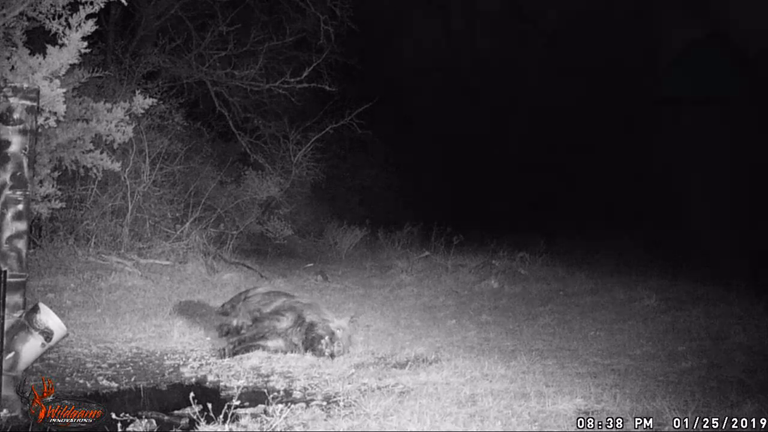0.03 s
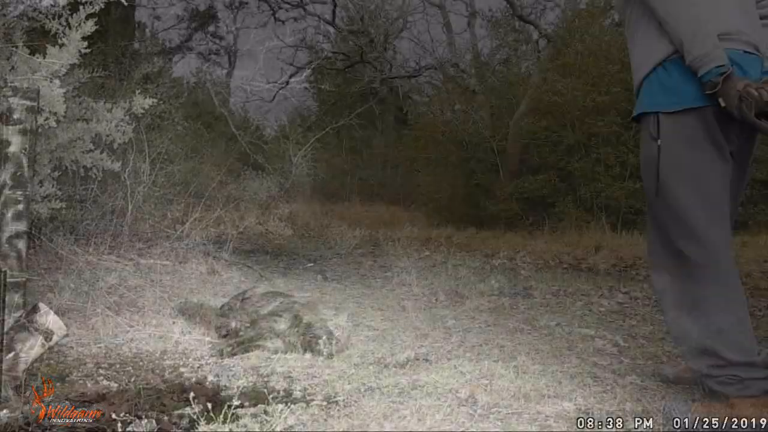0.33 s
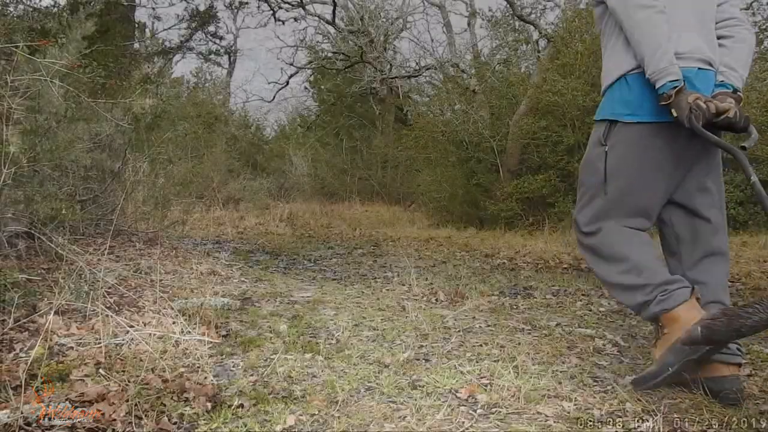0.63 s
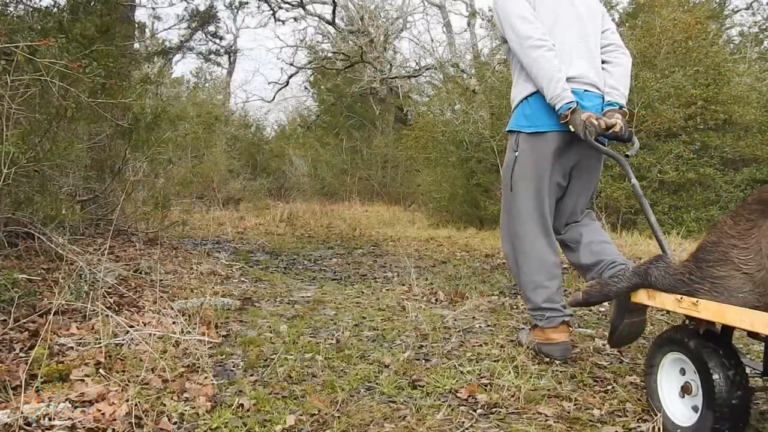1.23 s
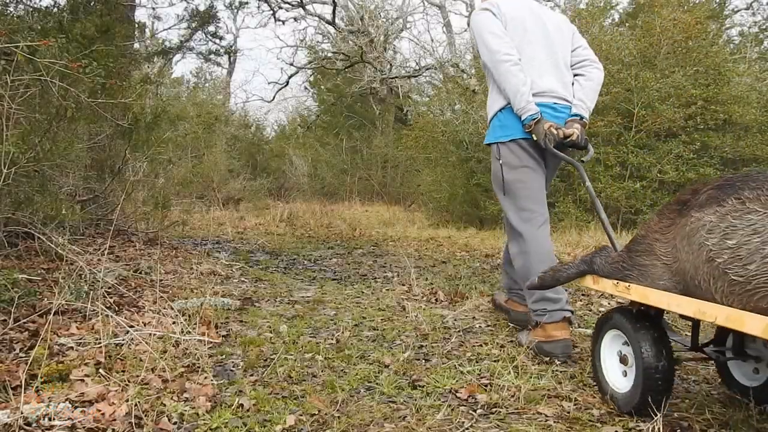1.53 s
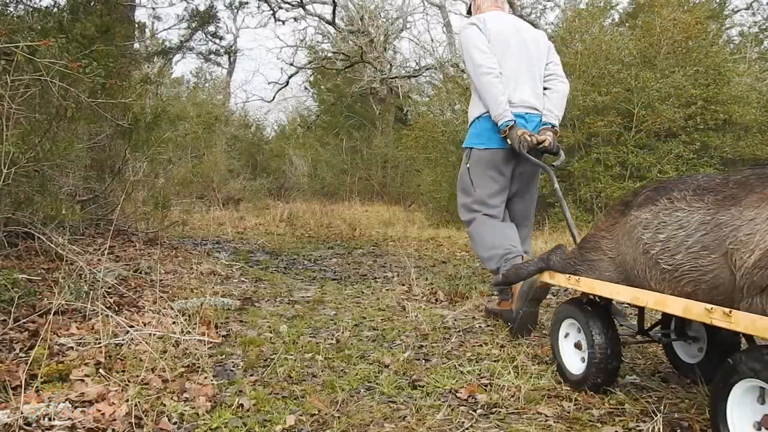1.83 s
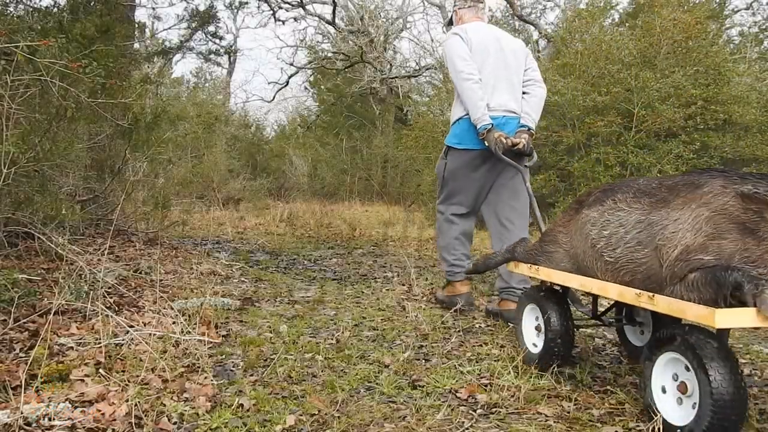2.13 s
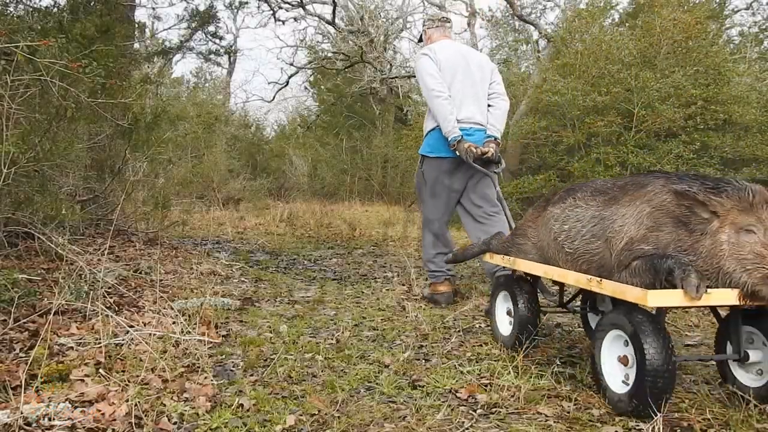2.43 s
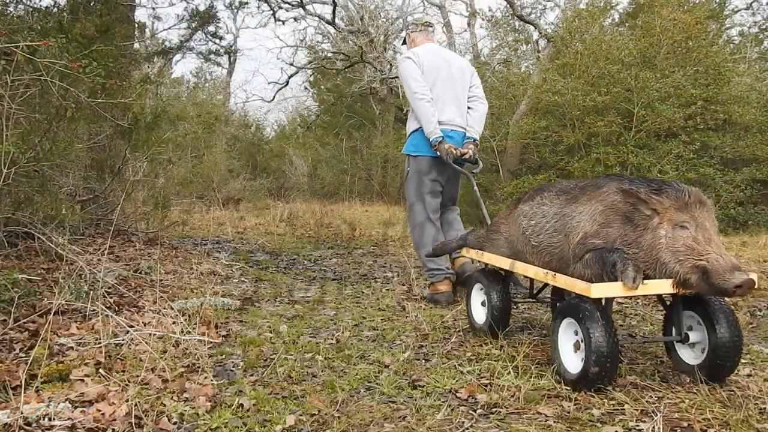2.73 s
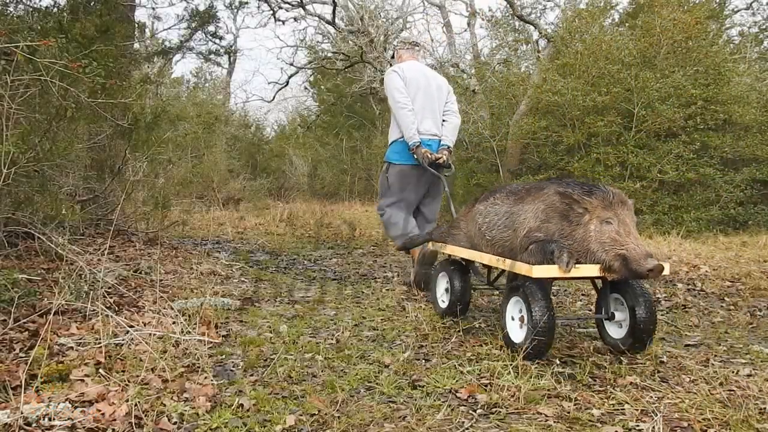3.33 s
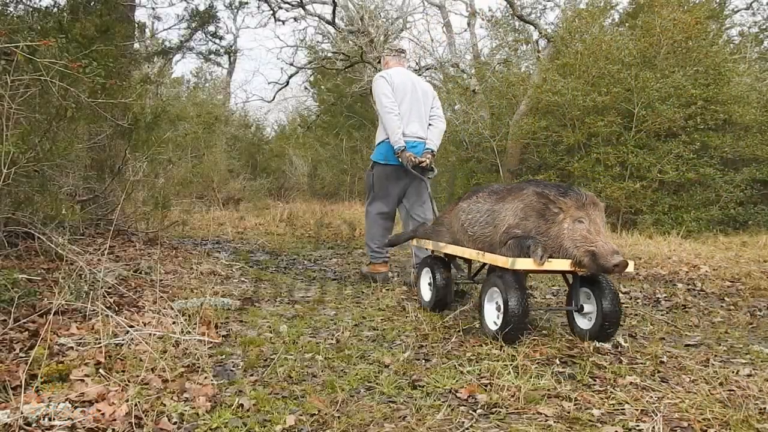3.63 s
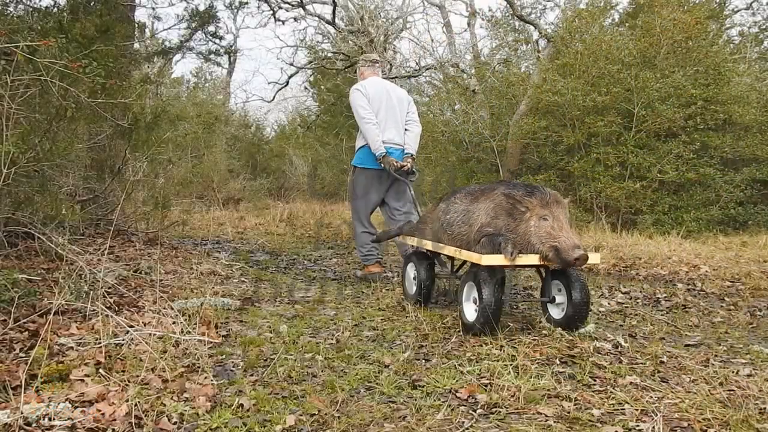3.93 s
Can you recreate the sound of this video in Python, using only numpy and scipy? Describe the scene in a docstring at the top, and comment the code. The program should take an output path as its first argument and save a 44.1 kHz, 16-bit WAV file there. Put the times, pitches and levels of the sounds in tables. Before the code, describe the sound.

A loaded cart rolls close by over grass and dry leaves, its tyres crackling and its wooden deck rumbling and knocking. Boots swish through the litter and twigs snap, while small birds chirp faintly in the woods.

```python
"""Cart pulled over grass and dry leaves

A walker pulls a loaded four-wheeled cart past and away. Tyres crackle through the litter; bumps make
the deck boom and knock. Boots scuff, a few twigs snap, rubber slips once. Small birds call from the
trees over faint wind. The scene fades in."""
import sys
import numpy as np
from scipy import signal
from scipy.fft import rfft, irfft
from scipy.io import wavfile
from scipy.ndimage import uniform_filter1d, map_coordinates

SR = 44100
rng = np.random.default_rng(int(sys.argv[2]) if len(sys.argv) > 2 else 0)


def unload_wav(signal):
    """Save mono or channel-first audio to the path in sys.argv[1] as 16-bit WAV at rate SR, clipped to [-1, 1]."""
    wavfile.write(
        sys.argv[1],
        SR,
        np.round(np.clip(np.atleast_2d(signal).T, -1, 1) * 32767).astype(np.int16),
    )


N = 176400


def leaves():
    """Clumps of dry leaves crackle under the tyres, with sparser, sharper ticks of stalks."""
    # crackle envelope: t/s, level/dB
    envelope = [(.12, -63), (.4, -57), (.48, -54), (.58, -48), (.7, -47), (.85, -44.5), (1.0, -42.5),
                (1.2, -40.5), (1.4, -41), (1.6, -40), (1.85, -42), (2.0, -38.5), (2.2, -40.5), (2.5, -39.5),
                (2.72, -42), (3.0, -39.5), (3.25, -42.5), (3.38, -42.5), (3.55, -40.5), (3.7, -45),
                (3.88, -43.5), (4, -44)]
    # crackle spectrum: f/Hz, level/dB
    spectrum = [(100, -47), (400, -15), (900, -15.5), (1250, -11.5), (2000, -7.5), (3500, -6.5),
                (5200, -4.5), (6400, 2), (7200, -4), (8200, -12.5), (10000, -23.5), (13000, -33),
                (15500, -59)]
    crush = grains(per_s=2200, spread_db=-0.5, wash=0.57) * amp(-0.3 * drift(rate_hz=19))
    ticks = amp(-23.5) * patchy(grains(per_s=110, spread_db=2.5, wash=0), depth_db=7)
    crackle = colour(patchy(crush, depth_db=2) + ticks, spectrum)
    return stereo(crackle) * amp(curve(envelope)[0])


def cart():
    """Bumps in the turf churn under the tyres, bounce them and set the loaded deck booming."""
    # rumble envelopes: t/s, deck boom/dB, tyre bounce/dB, churn/dB
    envelopes = [(.12, -73, -68, -72.5), (.33, -59.5, -69, -58.5), (.5, -48.5, -62, -53),
                 (.7, -49, -67, -50), (.85, -48.5, -56, -47), (1.05, -50, -49.5, -42),
                 (1.3, -48.5, -44.5, -46), (1.6, -68, -54, -45.5), (1.85, -52.5, -52, -44.5),
                 (2.05, -47, -42, -45.5), (2.18, -44.5, -64, -47), (2.45, -41, -48, -43.5),
                 (2.7, -45, -52, -48.5), (3.1, -45.5, -50.5, -45.5), (3.35, -46, -53, -49.5),
                 (3.55, -47.5, -45, -48.5), (4, -48, -54, -46)]
    # deck resonances: f/Hz, width/Hz, level/dB
    deck_modes = [(83.9, 8, -1), (125.5, 9.7, -5)]
    # churn spectrum: f/Hz, level/dB
    churn_spectrum = [(20, -33), (40, -13), (70, 4.5), (170, 0), (260, -2.5), (400, -12.5), (700, -14),
                      (1200, -20.5), (2500, -17.5), (6000, -40)]
    bounce_hz, bounce_width_hz = 62.1, 11.7
    boom_db, bounce_db, churn_db = curve(envelopes)
    turf = grains(per_s=1000, spread_db=1, wash=0.27) * amp(1.2 * drift(rate_hz=25))
    churn = stereo(colour(turf, churn_spectrum)) * amp(churn_db)
    boom = ring(deck_modes) * amp(boom_db)
    bounce = ring([(bounce_hz, bounce_width_hz, 0)]) * amp(bounce_db)
    return boom + bounce + churn


def knocks():
    """A wheel drops into a rut and rings the deck's hollow modes, in a new mix each time."""
    # wheel drops: t/s, peak/dB
    drops = [(1.584, -33), (1.827, -33), (2.094, -39.5), (2.385, -31.5), (2.421, -45), (2.695, -37.5),
             (2.9, -32.5), (3.094, -32), (3.279, -36), (3.694, -38.5)]
    # deck modes: f/Hz, level/dB, t60/s
    modes = [(176, -4.5, 0.22), (224.5, 1, 0.069), (287, -7.5, 0.055), (375.6, -1.5, 0.077),
             (460, -10, 0.059), (670, -12, 0.032)]
    out, t = np.zeros(N), np.arange(SR // 5) / SR
    attack_s = 0.0026
    for start_s, peak_db in drops:
        knock = np.zeros(len(t))
        for hz, db, t60_s in modes:
            scatter, phase = rng.standard_normal(2)
            knock += amp(db + 0.75 * scatter - 60 * t / t60_s) * np.sin(2 * np.pi * (hz * t + phase))
        knock *= np.minimum(t / attack_s, 1)
        add(out, start_s, amp(peak_db) * knock / abs(knock).max())
    return out


def boots():
    """Each step swells and dies: bright swish of leaves, dull tread on turf, crisp fizz at full press."""
    # footsteps: peak t/s, rise/s, fall/s, swish/dB, tread/dB, fizz/dB
    steps = [(0.465, 0.019, 0.028, -50, -48.5, -74), (.755, 0.014, 0.0067, -53, -57, -72),
             (1.066, 0.022, 0.029, -29.5, -36.5, -45), (1.55, 0.028, 0.043, -65, -57, -77),
             (1.735, 0.034, 0.027, -38.5, -47.5, -62), (2.385, 0.025, 0.035, -36.5, -44.5, -53),
             (2.875, 0.039, 0.038, -39.5, -42.5, -52), (3.096, 0.039, 0.028, -42.5, -36.5, -58),
             (3.455, 0.026, 0.028, -39.5, -46, -70), (3.797, 0.029, 0.037, -37.5, -56, -66)]
    # spectra of the three layers: f/Hz, level/dB
    swish_spectrum = [(200, -17), (1000, -15.5), (3000, -13.5), (5000, -2.5), (6500, 4.5), (7500, -2),
                      (9000, -17), (12000, -27.5), (15500, -58)]
    tread_spectrum = [(40, 16.5), (150, -3), (370, 5.5), (700, -1.5), (1200, -0.5), (2200, -3), (4000, -13),
                      (9000, -88)]
    fizz_spectrum = [(3000, -43), (6500, -15), (8500, 5.5), (10500, -7), (13000, -15), (15500, -26)]
    t, squareness = np.arange(N) / SR, 3.35
    swish_gain, tread_gain, fizz_gain = np.zeros((3, N))
    for peak_s, rise_s, fall_s, swish_db, tread_db, fizz_db in steps:
        width_s = np.where(t < peak_s, rise_s, fall_s)
        swell = np.exp(-0.5 * abs((t - peak_s) / width_s) ** squareness)
        swish_gain += amp(swish_db) * swell
        tread_gain += amp(tread_db) * swell
        fizz_gain += amp(fizz_db) * swell ** 2
    swish = colour(patchy(grains(per_s=2200, spread_db=2, wash=0.49), depth_db=2), swish_spectrum)
    tread = colour(grains(per_s=1700, spread_db=4.5, wash=0.32), tread_spectrum)
    fizz = colour(grains(per_s=1500, spread_db=3, wash=0.34), fizz_spectrum)
    return swish_gain * stereo(swish) + tread_gain * stereo(tread) + fizz_gain * stereo(fizz)


def twigs():
    """Twigs break with a woody crack; dry stalks splinter, the thin ones higher."""
    # twig and stalk breaks: t/s, peak/dB, pitch ratio
    cracks = [(1.5267, -22, 0.8), (1.689, -30, .85), (1.777, -28, 0.82), (1.824, -28, 0.78),
              (2.08, -31, 0.67), (2.119, -31, 1), (2.943, -18.5, 1), (3.6235, -23, 0.97)]
    splinters = [(.304, -46, 1.1), (.52, -41, 1.45), (.757, -28, 1.12), (1.092, -25, 1.1),
                 (1.329, -29, 1.42), (1.807, -28, .95), (1.891, -26, 1.05), (1.958, -24, 1),
                 (2.226, -27, 1.05), (2.9535, -14, 1), (3.326, -34, 1.35), (3.438, -21, 1.08),
                 (3.608, -28, 1.05), (3.633, -19.5, 1.04), (3.761, -27, 1)]
    # their spectra: f/Hz, level/dB
    crack_spectrum = [(100, -46), (600, 2.5), (1400, 6), (3000, 8.5), (4000, 13), (5000, -27), (12000, -37)]
    splinter_spectrum = [(300, -42), (2800, -51), (4000, -12), (5000, -9.5), (6600, -11), (8000, -29),
                         (14000, -51.5)]
    return (snaps(cracks, crack_spectrum, width=0.3, tear_db=-21)
            + snaps(splinters, splinter_spectrum, width=0.5, tear_db=-16))


def snaps(breaks, spectrum, width, tear_db, tear_s=0.003):
    """Each snap is an impulse, then a few milliseconds of tearing fibres."""
    out, t = np.zeros((2, N)), np.arange(2048) / SR
    for start_s, peak_db, pitch in breaks:
        fibres = rng.standard_normal((2, len(t))) * amp(tear_db) * np.exp(-t / tear_s)
        fibres[0, 0] = 1  # the break, centred
        mid, side = colour(fibres, np.array(spectrum) * [pitch, 1])
        snap = np.array([mid + width * side, mid - width * side])
        add(out, start_s, amp(peak_db) * snap / abs(mid).max())
    return out


def rub():
    """Rubber slips once with a hollow, rising thump; uneven slipping roughens its overtones."""
    # slip glide: t/s, f/Hz, level/dB
    glide = [(.882, 158.3, -46), (.895, 170.5, -29), (.903, 170, -32), (.911, 215, -30.5), (.92, 235, -36),
             (.94, 247, -58)]
    t = np.arange(N) / SR
    hz, db = curve(glide)
    phase = 2 * np.pi * np.cumsum(hz) / SR
    overtones = amp(-14.5) * drift(rate_hz=90) * (np.sin(2 * phase) + np.sin(3 * phase) / 2)
    slipping = (t > glide[0][0]) & (t < glide[-1][0])
    return np.sqrt(2) * amp(db) * (np.sin(phase) + overtones) * slipping


def birds():
    """One distant bird's run of falling chips and others' slurred whistles, blurred by the trees."""
    # chips: t/s, length/s, knee f/Hz, level/dB
    chip_calls = [(.15, 0.039, 3700, -63), (.372, .034, 3720, -57), (0.582, 0.03, 3690, -51),
                  (0.793, 0.026, 3680, -47.5), (1.004, 0.028, 3670, -46), (1.218, .03, 3700, -44),
                  (1.436, 0.036, 3660, -49), (1.85, 0.024, 4000, -48), (2.012, 0.022, 4000, -48),
                  (2.17, .026, 4000, -47.5), (2.33, 0.024, 3980, -48), (2.504, 0.032, 3900, -52)]
    # chip shape: share of length, ratio to knee pitch, gain/dB
    chip_shape = [(0, 1.03, 0), (.2, 1, 2), (.55, .98, 1), (.8, 0.82, -3), (1, 0.72, -4)]
    # slurs: t/s, length/s, start f/Hz, end f/Hz, level/dB
    slur_calls = [(0.236, 0.072, 3400, 2590, -67), (0.311, 0.035, 1820, 2100, -66),
                  (.522, 0.027, 1860, 2130, -59.5), (.695, .06, 3250, 2740, -58),
                  (0.858, .035, 2470, 2370, -56.5), (1.203, 0.052, 3330, 2580, -49),
                  (1.523, 0.052, 3200, 2600, -50), (1.834, 0.061, 3380, 2575, -48.5),
                  (1.893, 0.04, 2290, 2080, -54), (2.393, .05, 2370, 2310, -54),
                  (2.5, 0.066, 2385, 2330, -52.5), (2.537, 0.075, 3375, 3375, -52),
                  (2.618, 0.044, 2260, 2120, -47.5), (2.651, 0.06, 1970, 1780, -55),
                  (3.638, 0.031, 2910, 2860, -46), (3.878, .04, 2750, 2000, -54),
                  (3.96, 0.06, 3400, 2645, -55)]
    chips, slurs = np.zeros((2, N))
    share, pitch, gain_db = np.transpose(chip_shape)
    for start_s, length_s, knee_hz, db in chip_calls:
        progress = np.arange(0, length_s, 1 / SR) / length_s
        hz = knee_hz * np.interp(progress, share, pitch)
        add(chips, start_s, whistle(hz, db + np.interp(progress, share, gain_db)))
    for start_s, length_s, start_hz, end_hz, db in slur_calls:
        hz = np.geomspace(start_hz, end_hz, round(length_s * SR))
        add(slurs, start_s, whistle(hz, db))
    return woods(chips, direct_db=-1.5, echo_db=3) + woods(slurs, direct_db=-0.5, echo_db=-1)


def whistle(hz, db, quaver=0.005):
    """A gliding, slightly quavering note that swells and fades."""
    wobble = unit(uniform_filter1d(rng.standard_normal(len(hz)), size=200))
    phase = 2 * np.pi * np.cumsum(hz * (1 + quaver * wobble)) / SR
    swell = np.sqrt(2 * np.sin(np.linspace(0, np.pi, len(hz), endpoint=False)))
    return amp(db) * swell * np.sin(phase)


def woods(x, direct_db, echo_db, t60_s=0.5):
    """Direct sound plus its diffuse echo among the trees."""
    t = np.arange(SR // 2) / SR
    tail = rng.standard_normal((2, len(t))) * amp(-60 * t / t60_s)
    echo = signal.fftconvolve(x[None], tail / np.linalg.norm(tail[0]), axes=1)[:, :N]
    return amp(direct_db) * x + amp(echo_db) * echo


def air():
    """Faint, even hiss of wind in the woods."""
    # wind spectrum: f/Hz, level/dB
    spectrum = [(60, 5), (200, 10), (500, -12), (1200, -18), (3000, -8), (6300, -18), (8000, -25),
                (12000, -41)]
    return amp(-68.5) * stereo(colour(rng.standard_normal((2, N)), spectrum))


def grains(per_s, spread_db, wash):
    """Tiny breaks of uneven size; countless smaller ones merge into noise with power share `wash`."""
    size = amp(spread_db * np.minimum(rng.exponential(1, N), 4.5))
    hits = rng.random(N) < per_s / SR
    angle = rng.uniform(0, 2 * np.pi, N)
    clicks = unit(size * hits * np.array([np.cos(angle), np.sin(angle)]))
    return np.sqrt(1 - wash) * clicks + np.sqrt(wash) * rng.standard_normal((2, N))


def patchy(x, depth_db):
    """Every leaf has its own colour: brief random patches in time and frequency."""
    bins = signal.stft(x, nperseg=256)[2]
    patches = uniform_filter1d(rng.standard_normal(bins.shape[1:]), size=7, axis=0)
    patches = uniform_filter1d(patches, size=4, axis=1)
    return signal.istft(bins * amp(depth_db * unit(patches)), nperseg=256)[1][:, :N]


def ring(modes):
    """Resonances kept sounding at an even level by random bumps."""
    f, bumps = np.fft.rfftfreq(N, 1 / SR), rfft(rng.standard_normal((2, N)))
    ringing = sum(amp(db) * unit(irfft(bumps / (1 + 1j * (f - hz) / width_hz) ** 2, N))
                  for hz, width_hz, db in modes)
    power = uniform_filter1d(ringing ** 2, size=7000, axis=1)
    return stereo(ringing / np.sqrt(power + 1e-9))


def stereo(pair):
    """Two unrelated signals become left and right at rms 1, alike in the bass."""
    # left-right likeness: f/Hz, coherence
    likeness = [(50, 1), (250, 0.94), (500, 0.92), (1000, 0.85), (2000, 0.81), (4000, 0.88), (6500, 0.62),
                (12000, 0.15)]
    coherence = read(likeness, np.fft.rfftfreq(N, 1 / SR))
    mid, side = rfft(pair) * np.sqrt([1 + coherence, 1 - coherence])
    return unit(irfft(np.array([mid + side, mid - side]), N))


def colour(x, spectrum, size=4096):
    """Minimum-phase filter with the given spectrum."""
    log_gain = np.log(amp(read(spectrum, abs(np.fft.fftfreq(size, 1 / SR)))))
    response = np.exp(np.conj(signal.hilbert(log_gain)))
    taps = np.fft.ifft(response).real[:size // 2]
    return signal.oaconvolve(x, taps[None], axes=1)[:, :x.shape[1]]


def drift(rate_hz):
    """Random wander of rms 1, from 2 Hz to about rate_hz."""
    f = np.fft.rfftfreq(N, 1 / SR)
    band = np.exp(-(f / rate_hz) ** 2) * (f > 2)
    return unit(irfft(rfft(rng.standard_normal(N)) * band, N))


def amp(db):
    """Decibels to gain."""
    return 10 ** (np.asarray(db) / 20)


def unit(x):
    """Scales to rms 1."""
    return x / np.sqrt(np.mean(x ** 2) + 1e-20)


def read(points, hz):
    """Interpolates a table on a log-frequency axis."""
    f, value = np.transpose(points)
    return np.interp(np.log(hz + 1), np.log(f), value)


def curve(table):
    """Each column of a time table, at every sample."""
    times_s, *columns = np.transpose(table)
    return [np.interp(np.arange(N) / SR, times_s, column) for column in columns]


def add(mix, start_s, sound):
    """Mixes a sound in at start_s."""
    part = mix[..., round(start_s * SR):][..., :sound.shape[-1]]
    part += sound[..., :part.shape[-1]]


def scene():
    """Cart, walker and woods together."""
    return twigs() + leaves() + cart() + knocks() + boots() + rub() + birds() + air()


def record(dry):
    """Two close microphone ports, the left a little quieter and later; low cut, fade-in, band limit."""
    # port balance: f/Hz, left minus right/dB
    balance = [(60, -1.2), (130, -0.9), (400, -2), (1000, -3), (2000, -2.5), (8000, -2), (13000, -1.3)]
    # left port delay: t/s, lag/ms
    port_lag = [(0, 0.049), (1.5, 0.038), (4, 0.0024)]
    low_cut_hz, high_cut_hz = 45, 15700
    fade_start_s, fade_s = 0.1, 0.12
    f, t = np.fft.rfftfreq(N, 1 / SR), np.arange(N) / SR
    port_gain = amp(np.outer([0.5, -0.5], read(balance, f)))
    left, right = irfft(rfft(dry) * port_gain, N)
    lag_s = curve(port_lag)[0] / 1000
    left = map_coordinates(left, [(t - lag_s) * SR], order=5)
    highpass = signal.butter(4, low_cut_hz, btype="high", fs=SR, output="sos")
    lowpass = signal.firwin(511, high_cut_hz, window=("kaiser", 9), fs=SR)
    fade = np.clip((t - fade_start_s) / fade_s, 0, 1)
    faded = signal.sosfilt(highpass, [left, right]) * fade
    return signal.oaconvolve(faded, lowpass[None], "same")


dry = scene()
out = record(dry)
unload_wav(out)
```